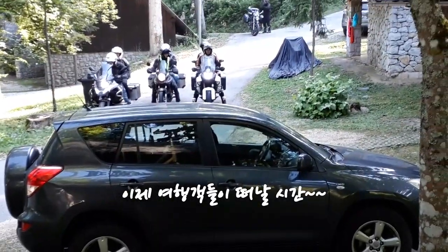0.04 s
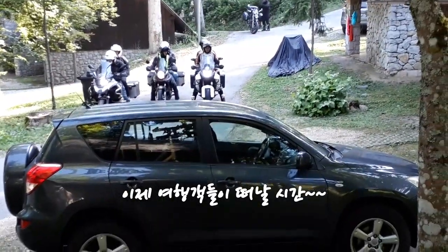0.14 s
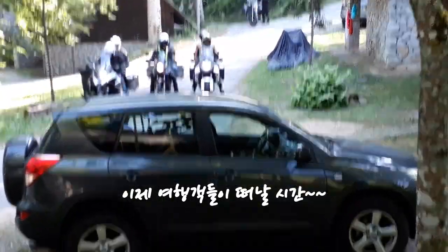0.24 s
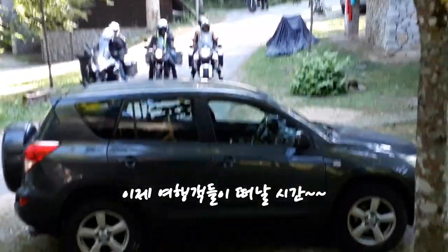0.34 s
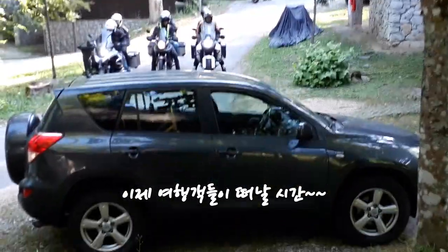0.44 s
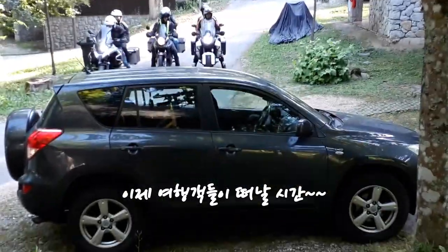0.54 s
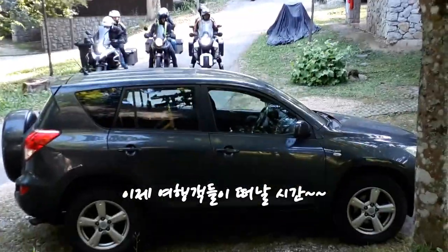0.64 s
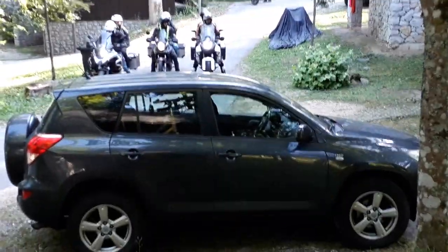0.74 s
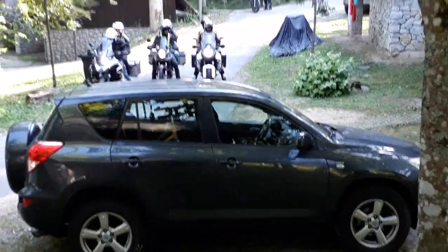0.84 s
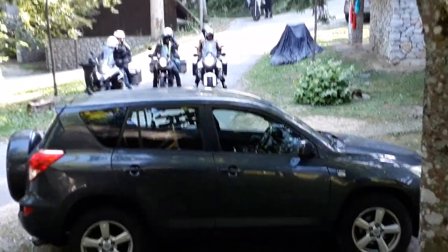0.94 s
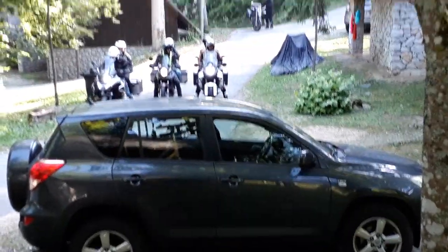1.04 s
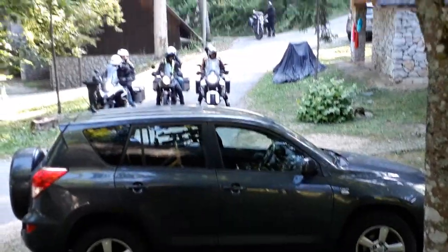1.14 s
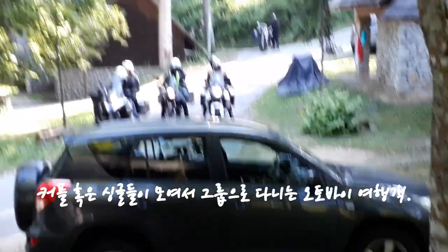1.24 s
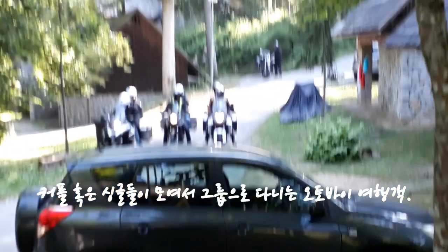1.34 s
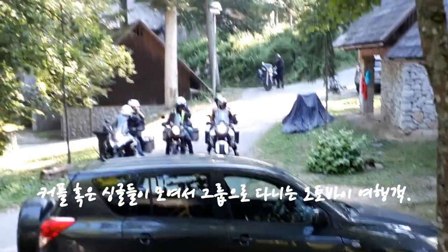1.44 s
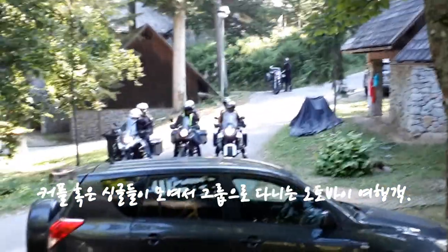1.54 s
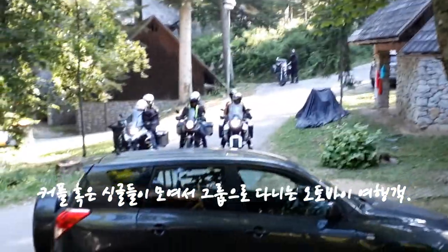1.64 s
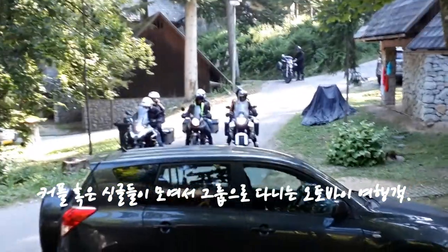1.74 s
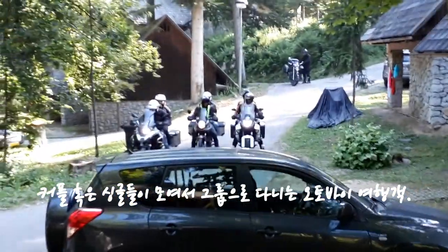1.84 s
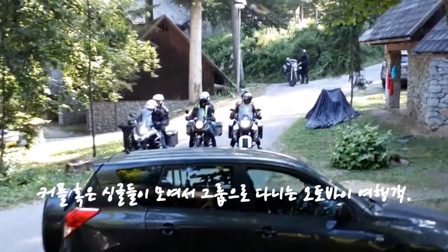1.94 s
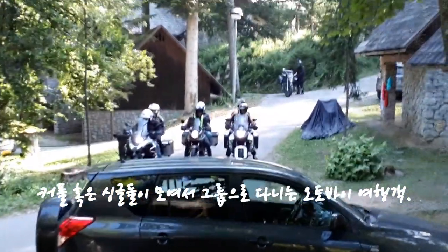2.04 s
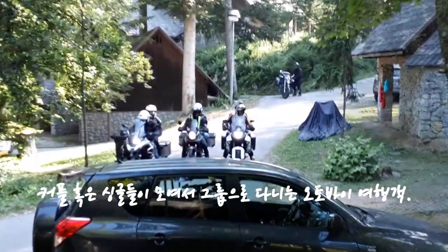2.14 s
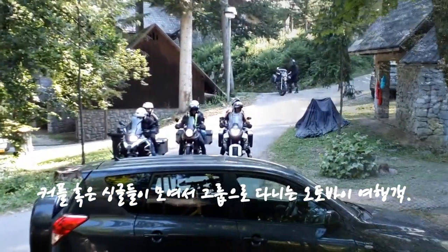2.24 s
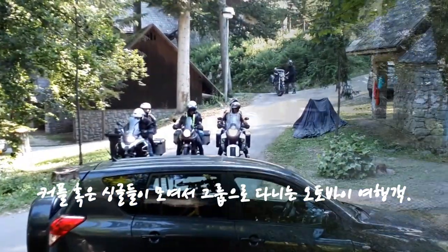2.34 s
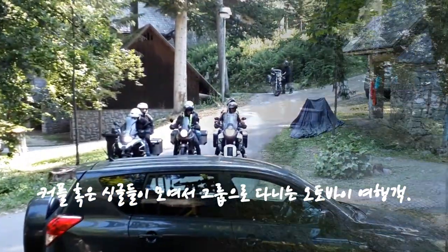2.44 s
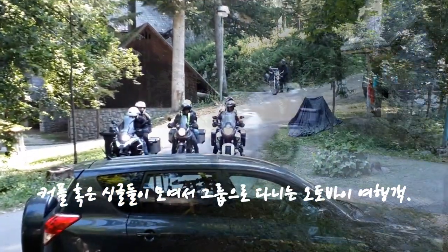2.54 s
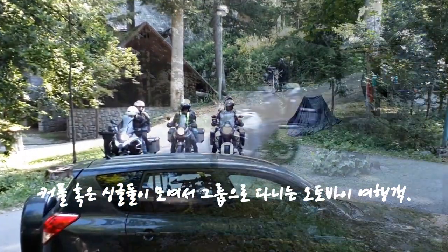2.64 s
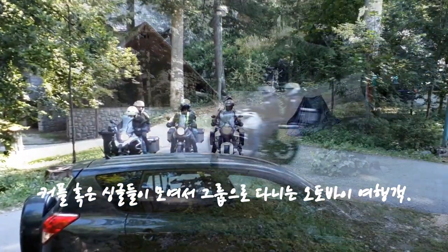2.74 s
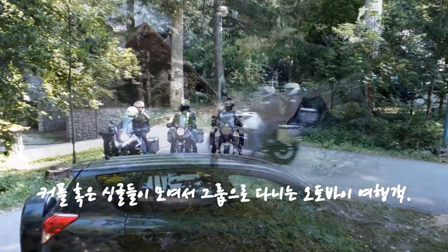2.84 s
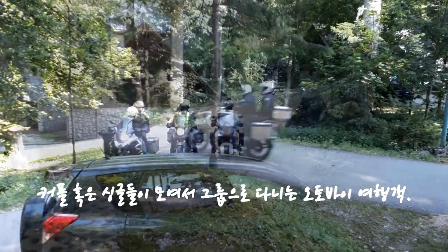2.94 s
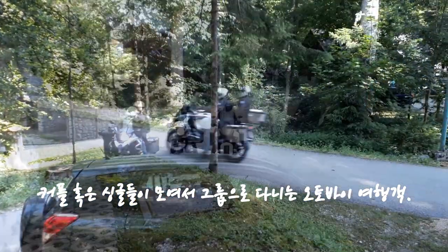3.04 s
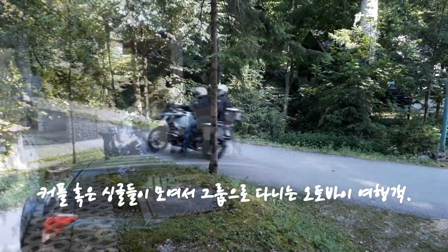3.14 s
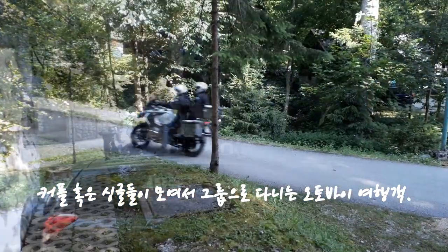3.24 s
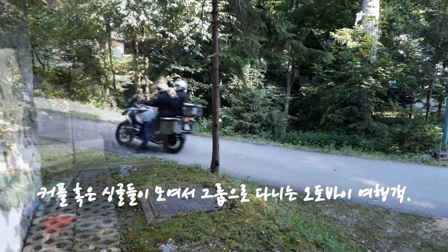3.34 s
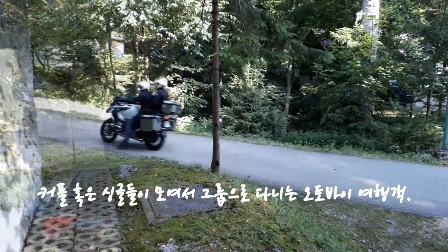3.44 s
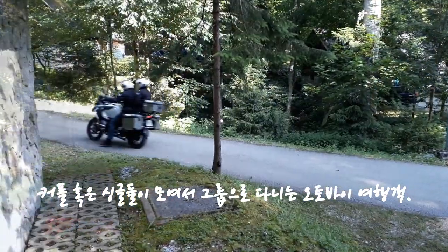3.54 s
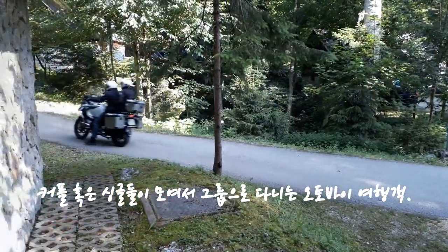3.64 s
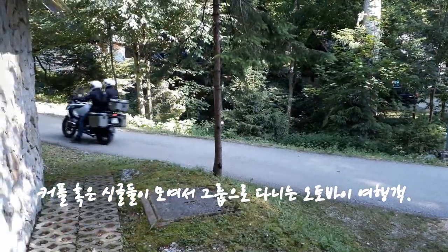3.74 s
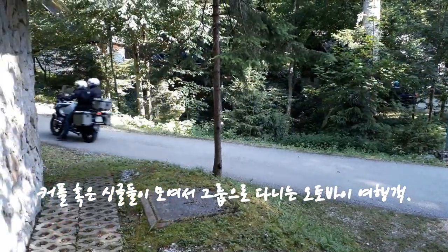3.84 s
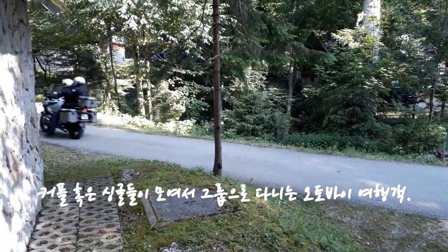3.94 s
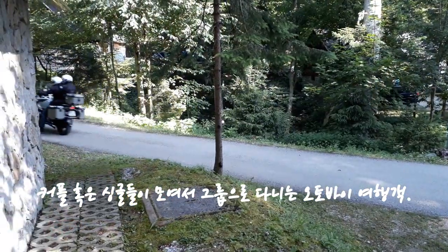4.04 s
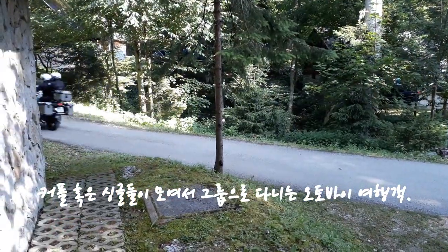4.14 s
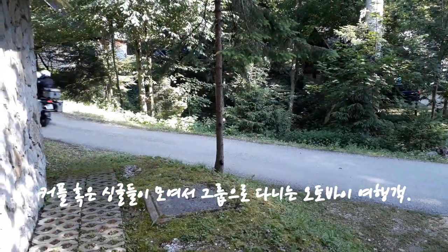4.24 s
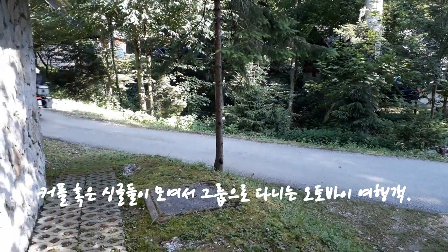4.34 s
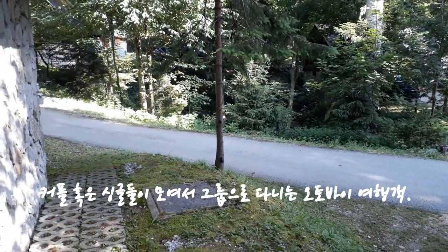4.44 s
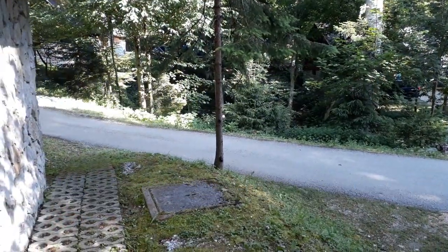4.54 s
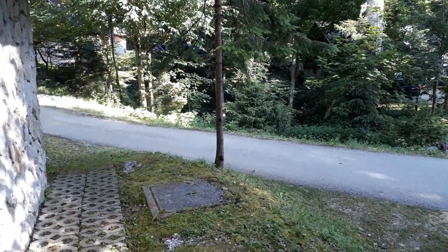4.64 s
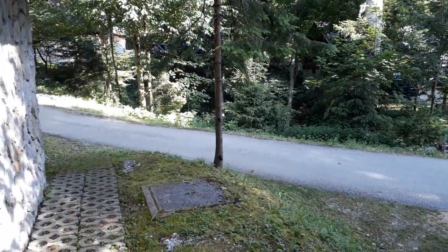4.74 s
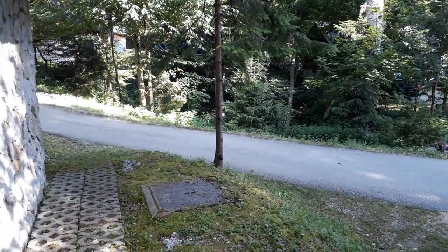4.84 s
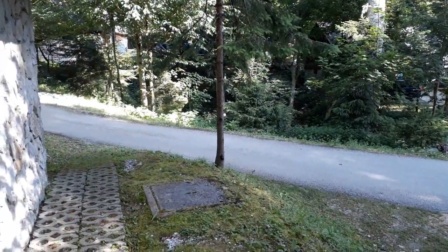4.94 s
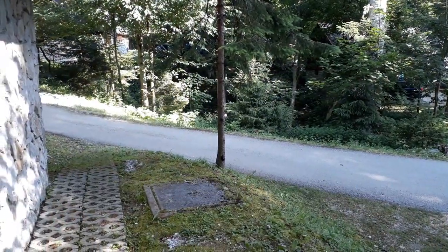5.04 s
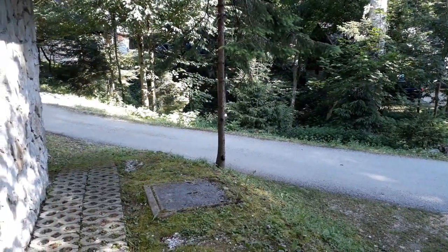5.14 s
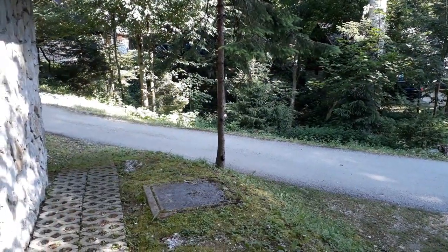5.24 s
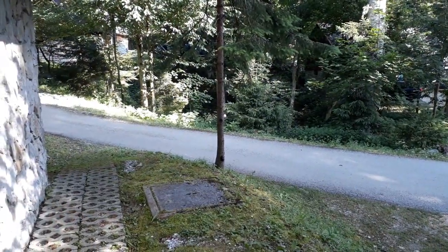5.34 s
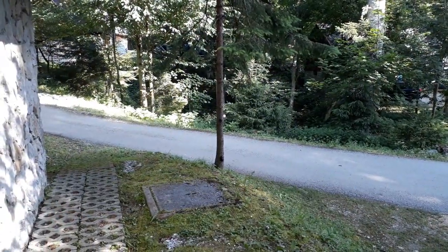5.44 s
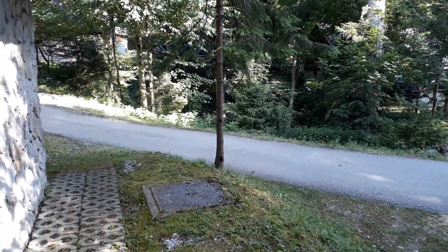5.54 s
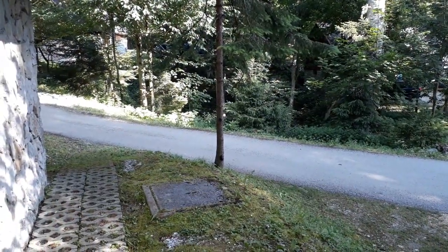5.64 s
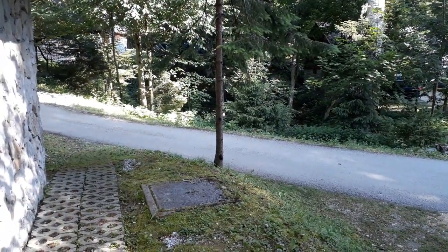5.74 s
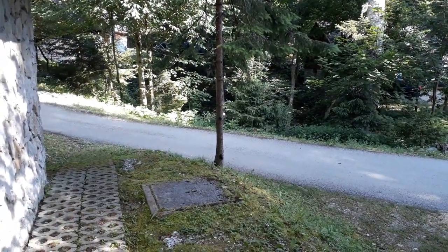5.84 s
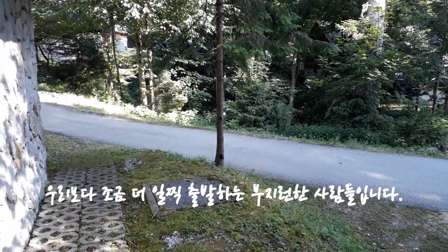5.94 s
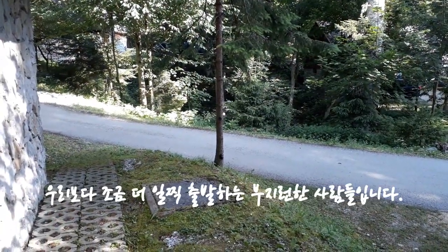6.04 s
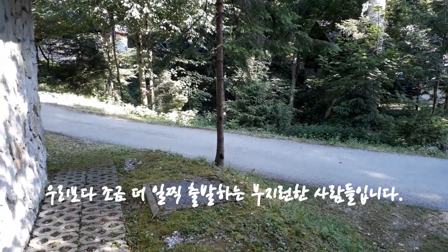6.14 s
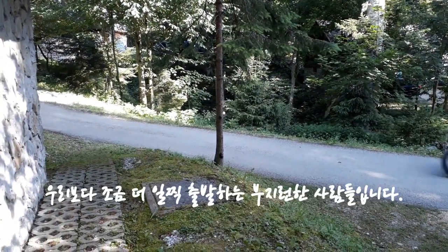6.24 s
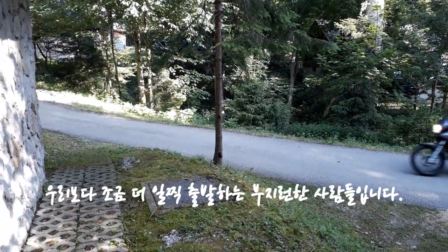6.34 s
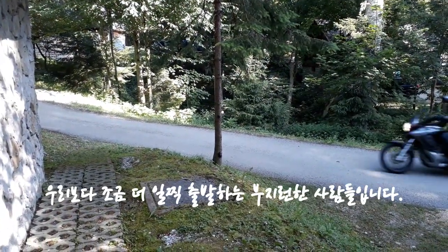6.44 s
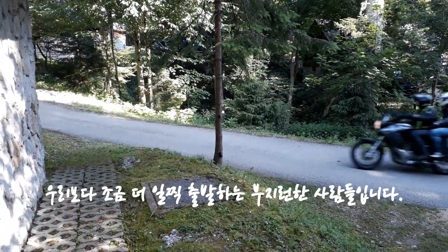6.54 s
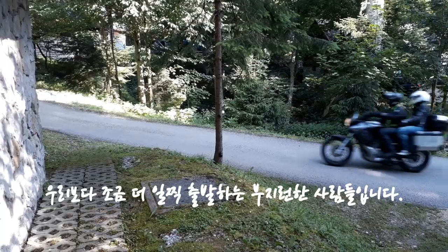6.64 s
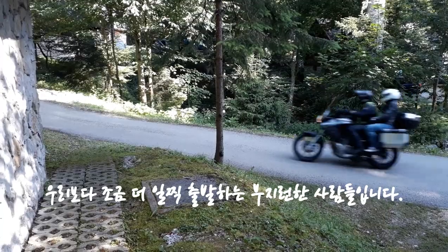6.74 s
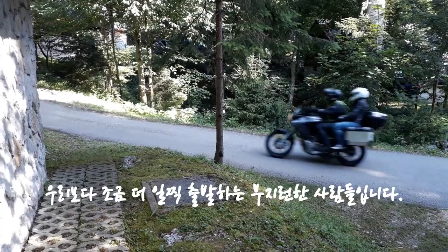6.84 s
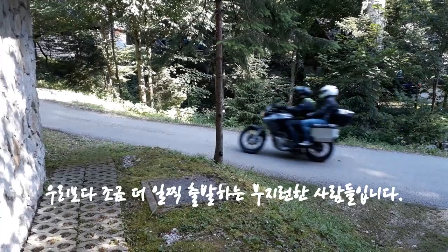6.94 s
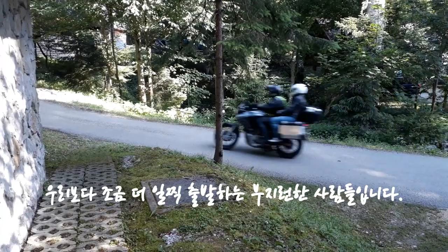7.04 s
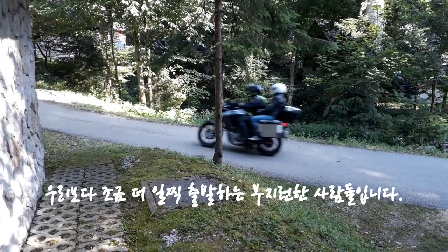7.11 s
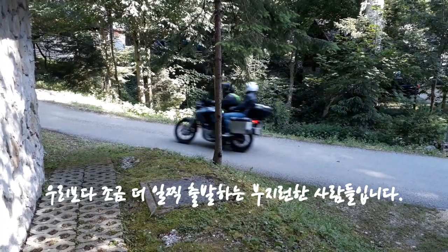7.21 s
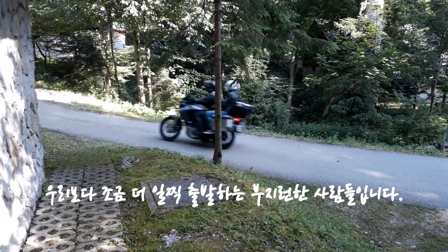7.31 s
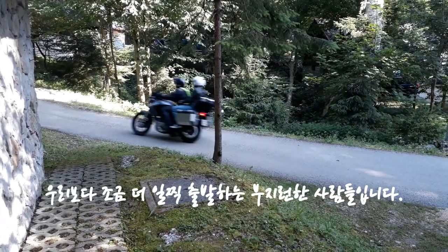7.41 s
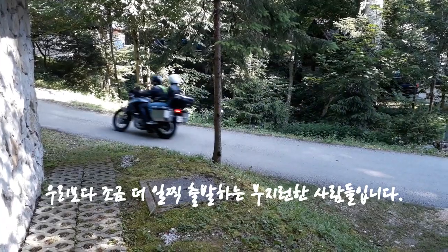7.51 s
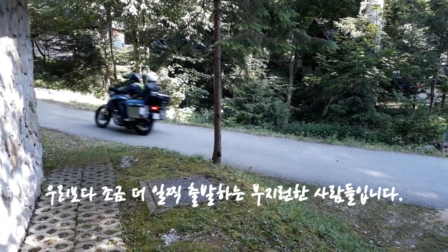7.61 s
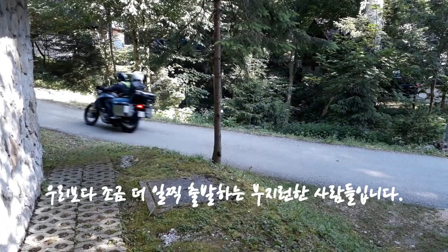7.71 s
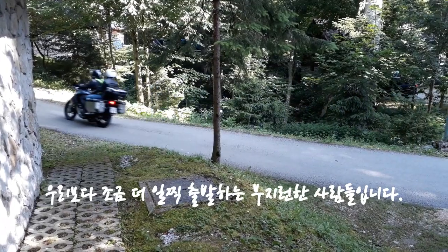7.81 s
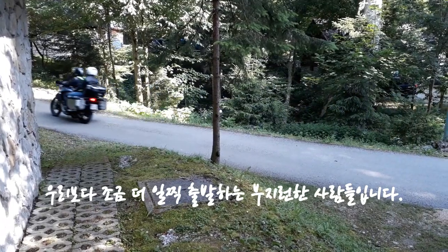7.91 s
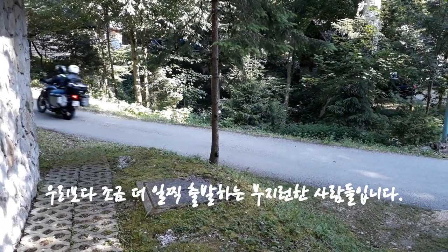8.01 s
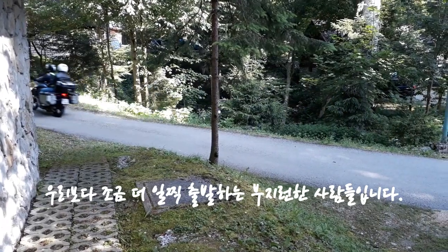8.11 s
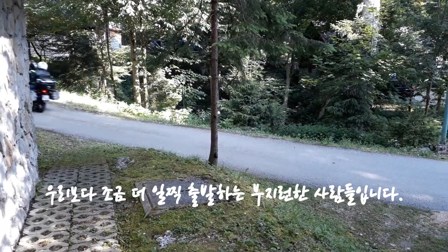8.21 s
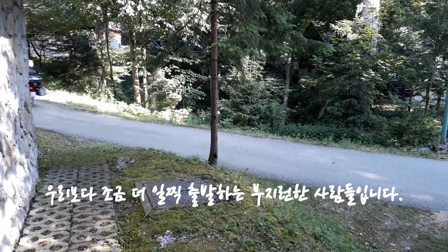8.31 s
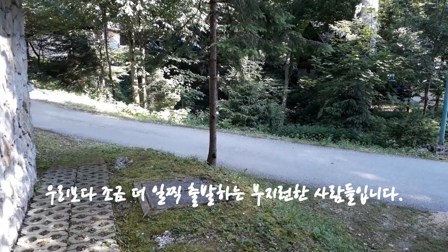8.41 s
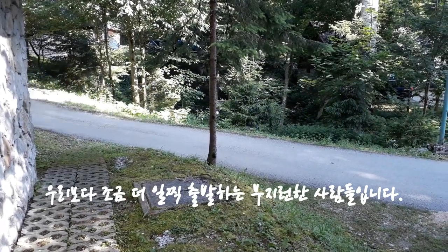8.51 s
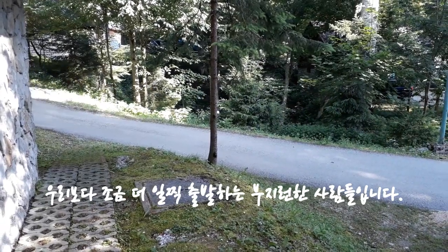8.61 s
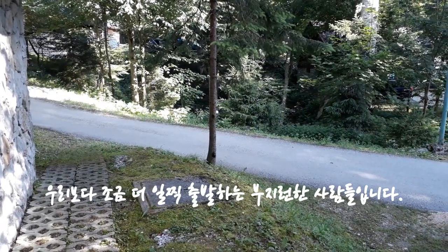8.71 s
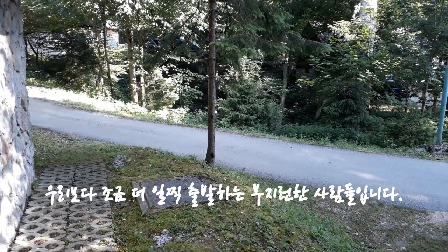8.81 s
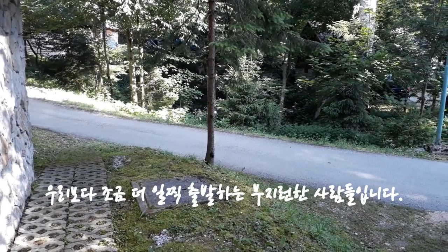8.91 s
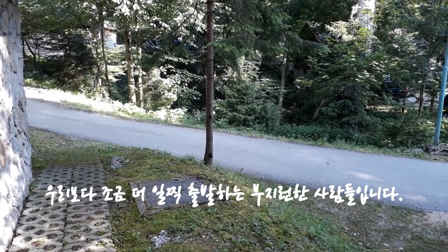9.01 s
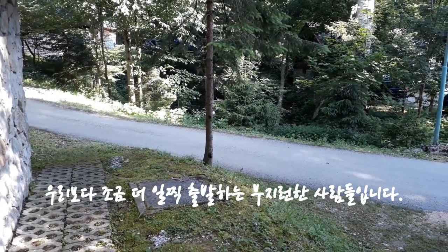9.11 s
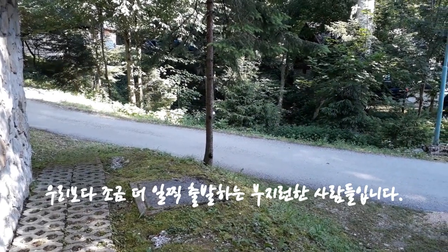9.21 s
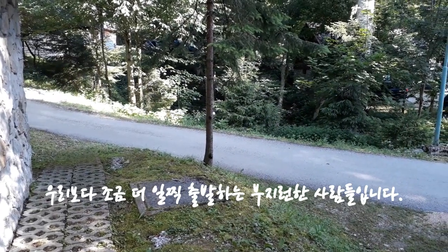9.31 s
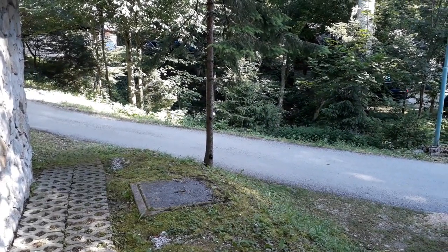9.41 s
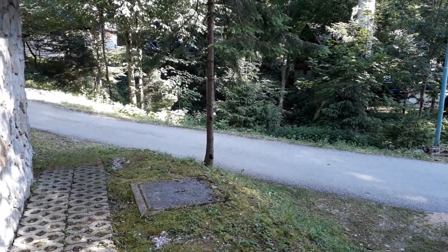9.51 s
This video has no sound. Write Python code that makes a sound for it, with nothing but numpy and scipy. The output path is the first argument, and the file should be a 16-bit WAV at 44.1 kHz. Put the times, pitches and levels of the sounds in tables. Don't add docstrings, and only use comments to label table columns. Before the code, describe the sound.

Outdoors in a wooded campsite, several touring motorcycles idle together with low uneven thumping, valve clatter and soft hiss, plus faint bird and insect chirps. The group fades slightly, then a short silence. The sound returns as a fast-turning bike passes close and rides off; a slower, lumpier twin follows, gaining revs with whine and metallic ringing. Idling continues behind while a bird sings nearby. A fixed roadside microphone hears the passes.

```python
import sys
import numpy as np
from scipy import signal
from scipy.io import wavfile
from scipy.ndimage import uniform_filter1d, map_coordinates

SR = 44100
rng = np.random.default_rng(int(sys.argv[2]) if len(sys.argv) > 2 else 0)


def output_pcm(signal):
    pcm = np.clip(np.atleast_2d(signal).T, -1, 1) * 32767
    wavfile.write(sys.argv[1], SR, np.round(pcm).astype(np.int16))


def natural_amplitude(level_db):
    exponent = np.asarray(level_db, float) / 20
    return 10 ** exponent


N = 422037
T = np.arange(N) / SR
CHANGE_S, BACK_S = 2.8795, 3.2


def evened(x):
    return x / np.sqrt(np.mean(x ** 2) + 1e-20)


def read(points, hz):
    point_hz, value = np.transpose(points)
    return np.interp(np.log(hz + 1), np.log(point_hz + 1), value)


def columns(rows):
    time_s, *values = np.transpose(rows)
    return [np.interp(T, time_s, v) for v in values]


def bell(t, peak_s, spread_s):
    return np.exp(-((t - peak_s) / spread_s) ** 2)


def swells(rows):
    return sum(db * bell(T, peak_s, spread_s) for peak_s, spread_s, db in rows)


def drift(hz):
    knots = rng.standard_normal(int(N / SR * 2 * hz) + 3)
    return evened(map_coordinates(knots, [T * 2 * hz], order=3))


def colour(x, points):
    bin_hz = abs(np.fft.fftfreq(16384, 1 / SR))
    log_gain = np.log(natural_amplitude(np.maximum(read(points, bin_hz), -100)))
    taps = np.fft.ifft(np.exp(np.conj(signal.hilbert(log_gain)))).real[:8192]
    return signal.oaconvolve(x, taps)[:N]


def resonate(x, hz, width_hz):
    turn = np.exp(2j * np.pi * np.cumsum(hz * np.ones(len(x))) / SR)
    r = np.exp(-np.pi * width_hz / SR)
    slow = x / turn
    for _ in range(2):
        slow = signal.lfilter([1 - r], [1, -r], slow)
    return 2 * (turn * slow).real


def per_cycle(turns, spread_db):
    strength = rng.standard_normal(int(turns[-1]) + 3)
    return natural_amplitude(spread_db * np.interp(turns + .5, np.arange(len(strength)), strength))


def exhaust(rows, faces):
    level_db, facing = columns(rows)
    return [level_db + np.interp(facing, np.arange(len(faces)), face) for face in np.transpose(faces)]


# hz, gain_db
PIPE = [(30, -13.5), (60, -26), (110, 1.5), (160, -2), (200, -5), (260, -7), (350, 1.5), (500, -7.5),
        (800, -17), (1500, -31)]
TWIN_SHARE = [(1, .4), (2, .65), (2.7, .9)]


def rider(speed, rows, faces, anchors, orders, wobble, spread_db, smear, scatter, lag, twin, order):
    hz, levels_db = columns(speed)[0], exhaust(rows, faces)
    turns = np.cumsum(hz) / SR - lag + wobble * drift(9)
    on = uniform_filter1d(1. * (T > rows[0][0]) * (T < rows[-1][0] + .01), size=4000)

    coarse = np.flatnonzero(on[::10] > 0) * 10
    blows = np.zeros(len(T[::10]))
    few_db = np.array(levels_db)[:, coarse]
    other = twin * np.interp(columns(rows)[1][coarse], *np.transpose(TWIN_SHARE))
    for k, order_db in enumerate(orders, start=1):
        weights = [np.interp(np.log(k), np.log(anchors), row) for row in np.eye(len(anchors))]
        level_db = order_db + np.dot(weights, few_db) - read(PIPE, k * hz[coarse])
        knots = rng.standard_normal((2, 120))
        fading_db, slip = [smear * k * np.interp(T[coarse], np.arange(120) / 12, row) for row in knots]
        share, gap = other / (1 + (k / 20) ** 2), 2 * np.pi * k * .55
        pull = np.arctan2(-share * np.sin(gap), 1 + share * np.cos(gap))
        phase = 2 * np.pi * k * (turns[coarse] + scatter * k * rng.uniform(-1, 1)) + pull + .12 * slip
        blows[coarse // 10] -= natural_amplitude(level_db + .6 * fading_db) * np.cos(phase)
    blows = signal.resample_poly(blows, 10, 1)[:N] * per_cycle(turns, spread_db)

    gate = natural_amplitude(levels_db[order]) * on * np.exp(-(turns % 1) / .3)
    return np.sqrt(2) * on * colour(blows, PIPE), gate


# time_s, cycle_hz
FIRST_HZ = [(3.2, 35.7), (3.48, 37.3), (4.24, 40.4), (4.49, 40.7), (4.61, 41.5), (4.81, 40.5), (5.12, 41.3),
            (5.94, 39.1), (6.3, 36.8)]
# time_s, level_db, facing (0 side - 2 tail)
FIRST = [
    (3.1, -28.5, 0.096),
    (3.5, -26, 0.037),
    (3.8, -26, 0.61),
    (4.4, -29, 1.42),
    (4.65, -32, 2),
    (5.12, -34, 1.8),
    (5.63, -34, 2),
    (5.94, -36.5, 1.9),
    (6.3, -46, 1.1),
]
FIRST_FACES = [
    (-12.5, 0, -5.5, -4.5, -13.5, -28),
    (-9, 0, -8, -12, -13.5, -18),
    (-6.5, 0, -9, -11, -18, -28),
]
FIRST_ANCHORS = [2, 3, 4, 6, 9, 11]
# level_db of orders 1, 2, 3 ..
FIRST_ORDERS = [-25, 0, 0, 0, -6, 0, -8, -13, 0, -9, 4, -9, -12, -14, -13, -14]


def first_rider():
    return rider(FIRST_HZ, FIRST, FIRST_FACES, FIRST_ANCHORS, FIRST_ORDERS, wobble=.005, spread_db=1.2,
                 smear=.02, scatter=.002, lag=.025, twin=0, order=1)


# time_s, cycle_hz
SECOND_HZ = [(4.9, 14.8), (5.88, 15.85), (6.47, 19.3), (6.79, 21), (7.5, 23.9), (7.83, 25.5), (8.53, 27.9),
             (8.93, 27.8), (9.57, 26.5)]
# time_s, level_db, facing (0 head-on - 6 gone)
SECOND = [(4.9, -42.5, -1.5), (6.0, -46, 0), (6.3, -43, -0.5), (6.5, -33, .5), (6.75, -27.5, 1),
          (7.0, -29, 2), (7.3, -31.5, 3), (7.7, -38, 4), (8.2, -40.5, 5), (8.8, -44.5, 6), (9.57, -50.5, 6)]
SECOND_FACES = [
    (-21, -8, -1.5, 0, 3.5, -7.5, -6.5, -7, -11.5, -13.5, -15.5),
    (-27, -6, 4, 0, -14, -5.5, -13, -16, -18, -14.5, -25),
    (-18, -6.5, 0.5, 0, -20, -5, -12, -3.5, -27, -23, -19),
    (-10, 2, -3, 0, -11, -1, -12, -13.5, -15.5, -22, -20),
    (1.5, 9, 3, 0, -2, -1, 5, -1, 1, -11.5, -18),
    (1, 4.5, 4, 0, -19, -1.5, -2, 0, -9, -28, -25),
    (0, 5, 2, 0, -11, -15, -9.5, -13, -21, -30, -41),
]
SECOND_ANCHORS = [3, 5, 6, 7, 9, 11, 14, 16, 18, 23, 33]
# level_db of orders 1, 2, 3 ..
SECOND_ORDERS = [-38, -26, 0, 1, 0, 0, 0, -6, 0, -8, 0, -6, -10, 0, -6, 0, -1, 0, -2, 2, -6, -2, 0, -3, 0,
                 -1, -5, -4, -1, 2, -3, -1, 0, 0, -4, -2, 2, -3, 1, 0, -4, -2, -4, -2, -1, -5, -2, -5, -3,
                 -5]
SECOND_LAG = .08


def second_rider():
    return rider(SECOND_HZ, SECOND, SECOND_FACES, SECOND_ANCHORS, SECOND_ORDERS, wobble=.0025, spread_db=1.1,
                 smear=.06, scatter=.0016, lag=SECOND_LAG, twin=1, order=3)


# time_s, mesh_hz
GEAR_HZ = [(4.2, 104), (4.6, 112.5), (5.0, 115.5), (5.5, 118), (6.0, 120.5), (6.6, 123)]
# multiple, width_hz, peak_s, spread_s, level_db
GEAR_WHINE = [(4, 15, 6.28, 0.71, -44), (5, 9.7, 5.83, .3, -49), (6, 27, 4.7, .45, -50.5),
              (6, 17, 5.56, 0.49, -51), (8.5, 23, 4.78, 0.47, -54), (8.85, 35, 5.38, 0.4, -52.5),
              (8.3, 20, 6.1, 0.22, -52)]


def gears():
    mesh_hz, noise, out = columns(GEAR_HZ)[0], rng.standard_normal(N), np.zeros(N)
    for multiple, width_hz, peak_s, spread_s, level_db in GEAR_WHINE:
        near = abs(T - peak_s) < 3 * spread_s
        tone_hz = multiple * mesh_hz[near]
        fuzz = evened(resonate(noise[near], tone_hz, width_hz))
        tone = 2 * np.sin(2 * np.pi * np.cumsum(tone_hz) / SR)
        out[near] += natural_amplitude(level_db) * bell(T[near], peak_s, spread_s) * evened(fuzz + tone)
    return out


# peak_s, ring_hz, width_hz, spread_s,
# level_db
SINGING = [(3.55, 2190, 170, 0.34, -48.5), (3.4, 2960, 160, 0.37, -49), (3.4, 3940, 120, .2, -55),
           (4.03, 974, 35, 0.17, -51), (3.86, 1360, 70, .15, -56), (5.38, 91, 6.5, 0.34, -35),
           (6.47, 2700, 200, 0.37, -52), (6.75, 3350, 200, .15, -55), (6.3, 5800, 130, .12, -53),
           (6.5, 4100, 200, .2, -48), (6.6, 495, 14, 0.25, -43.5), (6.75, 1000, 41, 0.25, -39.5),
           (6.7, 1210, 35, 0.12, -42), (7.1, 1060, 94, 0.11, -44), (7.2, 734, 75, 0.24, -39),
           (7.5, 1300, 55, 0.1, -44), (7.7, 453, 70, 0.3, -41), (7.92, 1610, 83, .17, -45),
           (7.9, 2010, 60, 0.15, -47), (7.6, 2700, 90, 0.17, -52)]


def singing_bands():
    noise, out = rng.standard_normal(N), np.zeros(N)
    turns = np.cumsum(columns(SECOND_HZ)[0]) / SR
    firings = evened(np.diff(np.floor(turns + 1 - SECOND_LAG), prepend=0))
    for peak_s, ring_hz, width_hz, spread_s, level_db in SINGING:
        drive = noise + 1.2 * firings * (peak_s > 6.2) * (ring_hz < 1400)
        near = abs(T - peak_s) < 3 * spread_s
        ring = evened(resonate(drive[near], ring_hz, width_hz))
        out[near] += natural_amplitude(level_db) * bell(T[near], peak_s, spread_s) * ring
    return out


# firing_hz, level_db
IDLERS = [(26.86, 5.5), (19.33, 3), (21.32, 3.5), (23.71, 1)]


def idlers(shake, spread_db):
    clicks = np.zeros(N)
    for firing_hz, level_db in IDLERS:
        turns = np.cumsum(firing_hz * (1 + shake * drift(3))) / SR + rng.random()
        clicks[1:] += natural_amplitude(level_db) * np.diff(np.floor(turns)) * per_cycle(turns, spread_db)[1:]
    puffs = signal.lfilter([1], [1, -np.exp(-1 / (0.0036 * SR))], clicks)
    return evened(clicks - clicks.mean()), evened(puffs)


# hz, density_db (per Hz)
THUMP = [
    [(15, -69), (25, -24), (42, -9.5), (65, -2), (145, 2.5), (167, -1.5), (179, -12.5), (217, 2.5),
     (249, -3.5), (279, -15.5), (325, -10), (374, -15.5), (412, -11), (461, -23.5), (700, -32),
     (910, -59.5), (1540, -120)],
    [(15, -88), (25, -50), (37, -41.5), (51, -10.5), (72, -3.5), (119, 4.5), (181, -4), (264, -6.5),
     (379, -14), (412, -42.5), (467, -22.5), (560, -24.5), (700, -37.5), (910, -47), (1540, -120)],
]


def thump(shot, clicks):
    return evened(colour(clicks + (.8 + .5 * shot) * rng.standard_normal(N), THUMP[shot]))


def near_far(x, colours, near):
    return near * evened(colour(x, colours[0])) + (1 - near) * evened(colour(x, colours[1]))


# hz, density_db (per Hz)
CLATTER = [
    [[(260, -45.5), (450, -5.5), (633, -14.5), (701, -11), (772, -18), (873, -6.5), (1310, -13.5),
     (1520, -11), (1650, -18.5), (1950, -18), (2300, -17), (2990, -47), (5060, -120)], [(260, -48),
     (450, -10), (843, -9), (921, -12.5), (1010, -3), (1100, -12), (2160, -25.5), (2300, -24), (2990, -37),
     (5060, -120)]],
    [[(260, -29), (450, -2.5), (488, -5), (583, -14), (669, -9.5), (885, -13), (993, -9), (2300, -19.5),
     (2990, -45), (5060, -120)], [(260, -32), (450, 0), (549, -3), (591, -11), (633, -4), (687, -7.5),
     (1130, -4), (1240, -4.5), (2300, -8), (2990, -26), (5060, -120)]],
]
# ring_hz, width_hz, level_db
CASINGS = [(412, 21, -3), (863, 85, -13), (1026, 74, -20.5), (1982, 220, -12)]


def clatter(shot, beat, near):
    knocks = rng.standard_normal(N) * (1 + 0.14 * beat) * natural_amplitude(1.0 * drift(12))
    out = near_far(knocks, CLATTER[shot], near)
    if shot == 0:
        for ring_hz, width_hz, level_db in CASINGS:
            moving_hz = ring_hz + 0.19 * width_hz * drift(0.97)
            out += natural_amplitude(level_db + 2 * drift(2.01)) * evened(resonate(knocks, moving_hz, width_hz))
    return out


# hz, density_db (per Hz)
FIZZ = [
    [[(1000, -40.5), (1700, -10), (1970, -6.5), (2420, -10), (2960, -7), (3700, -10.5), (4620, -10.5),
     (6450, -16), (7420, -17), (9440, -28), (11100, -25.5), (12600, -26.5), (15600, -31)], [(1000, -21),
     (1700, -5), (2010, -10), (2160, -4.5), (3500, -5.5), (3810, -5), (7420, -19), (9440, -30.5),
     (11400, -24), (15600, -33.5)]],
    [[(1000, -6.5), (1700, 0), (2290, -0.5), (2940, 1.5), (3470, -1.5), (4620, -4), (5830, -9),
     (7910, -24.5), (9520, -29), (11500, -22.5), (13300, -27.5), (15600, -38)], [(1000, -35.5), (1700, -4),
     (1880, 0), (3220, -2), (3600, -1.5), (4840, -4), (6100, -7.5), (8060, -22.5), (9520, -25.5),
     (11400, -21.5), (12900, -27.5), (15600, -29.5)]],
]
# peak_s, spread_s, treble_db
GUSTS = [(.8, 0.36, 1), (3.4, 0.88, -1), (6.2, 0.93, 3.5), (9.4, 0.58, 5)]


def fizz(shot, beat, near):
    hiss = rng.standard_normal(N) * (1 + 0.088 * beat) * natural_amplitude(0.41 * drift(6))
    out = near_far(hiss, FIZZ[shot], near)
    treble = signal.sosfiltfilt(signal.butter(2, 6500, "high", fs=SR, output="sos"), out)
    return out + (natural_amplitude(-1 + swells(GUSTS)) - 1) * treble


# thump_db, clatter_db, fizz_db
STEADY_DB = [
    (-34.5, -46.5, -44.5),
    (-32, -46, -44.5),
]
# time_s, level_db
TURN_AWAY = [(0, 0), (1.9, 0), (2.1, -1), (2.3, -2.5), (2.5, -4), (2.88, -6)]
TURN_SHARE = (0.93, 1.53, 0.94)
# closest_s, road_time_s, clatter_db, fizz_db
PASSES = [
    (3.6, 0.88, -49.5, -41),
    (4.0, 0.61, -43, -44),
    (6.75, 0.49, -34.5, -36),
    (7.7, 0.84, -42.5, -38.5),
]
# peak_s, spread_s, thump_db
BLIPS = [
    (4.2, 0.46, -0.5),
    (4.9, .3, 1.5),
    (5.6, 0.22, -2),
    (6.35, 0.72, 3),
    (7.8, .2, 0.5),
    (8.2, 0.32, 3.5),
    (8.8, .15, -2),
    (9.3, 0.2, 1),
]


def group_levels(shot):
    thump_db, *noise_db = STEADY_DB[shot]
    if shot == 0:
        fade_db = columns(TURN_AWAY)[0]
        return [db + share * fade_db for db, share in zip(STEADY_DB[0], TURN_SHARE)]
    levels_db = [thump_db + swells(BLIPS)]
    for k, steady_db in enumerate(noise_db):
        power = natural_amplitude(2 * steady_db)
        for closest_s, road_time_s, *peak_db in PASSES:
            power = power + natural_amplitude(2 * peak_db[k]) / (1 + ((T - closest_s) / road_time_s) ** 2) ** 1.3
        levels_db.append(10 * np.log10(power))
    return levels_db


def patchy(x, depth_db):
    z = signal.stft(x, nperseg=1024)[2]
    field = uniform_filter1d(rng.standard_normal(z.shape), size=3, axis=0)
    field = evened(uniform_filter1d(field, size=24, axis=1))
    gain = natural_amplitude(depth_db * field) / np.sqrt(np.mean(natural_amplitude(2 * depth_db * field)))
    return signal.istft(z * gain, nperseg=1024)[1][:N]


# all_near_db, all_far_db
NEAR_DB = [
    (-44.5, -45),
    (-37.5, -44.5),
]


def group(rider_gate):
    clicks, puffs = idlers(shake=0.00594, spread_db=-0.5)
    low, high = np.zeros((2, N))
    for shot in range(2):
        thump_db, clatter_db, fizz_db = group_levels(shot)
        near = np.interp(fizz_db, NEAR_DB[shot][::-1], [0, 1])
        beat = (1 - 0.13 * shot) * puffs + shot * 8.0 * rider_gate
        heard = (T > BACK_S) if shot else (T < CHANGE_S)
        low += heard * natural_amplitude(thump_db) * thump(shot, clicks)
        high += heard * natural_amplitude(clatter_db) * clatter(shot, beat, near)
        high += heard * natural_amplitude(fizz_db) * fizz(shot, beat, near)
    return low + patchy(high, depth_db=1.1)


def sing(rows, arch_turns, echo_share):
    song, lag_s = np.zeros(N), np.arange(14000) / SR
    for start_s, length_s, from_hz, to_hz, level_db in rows:
        t = np.arange(0, length_s, 1 / SR)
        slow = evened(uniform_filter1d(rng.standard_normal((2, 6000)), size=150))
        warble, flutter = slow[:, :len(t)]
        hz = from_hz + (to_hz - from_hz) * np.sin(2 * np.pi * arch_turns * t / length_s) + 45 * warble
        tone = np.sin(2 * np.pi * np.cumsum(hz) / SR) * signal.windows.tukey(len(t), .5)
        song[round(start_s * SR):][:len(t)] += natural_amplitude(level_db + 2 + 1.8 * flutter) * tone
    echoes = rng.choice([-1., 1.], size=14000) * (rng.random(14000) < .03) * natural_amplitude(-60 * lag_s / 0.35)
    echoed = signal.oaconvolve(song, echoes / np.linalg.norm(echoes))[:N]
    return np.sqrt(1 - echo_share) * song + np.sqrt(echo_share) * echoed


# start_s, length_s, from_hz, to_hz, level_db
SINGER = [(5.6, .025, 3700, 3620, -48), (5.609, 0.059, 3050, 2530, -43), (5.666, 0.054, 2550, 2940, -41),
          (5.805, .09, 3630, 3714, -41.5), (6.145, 0.08, 3105, 3046, -37.5), (6.191, .07, 2480, 2710, -47),
          (6.27, .04, 3050, 3150, -46), (6.342, 0.057, 2800, 3030, -45), (6.505, 0.064, 3200, 3130, -41),
          (6.535, .085, 2980, 2930, -41), (6.626, .045, 2950, 3300, -41), (6.664, .075, 2500, 2900, -42),
          (6.786, 0.105, 3320, 3460, -44.5), (6.917, .05, 4450, 4190, -38.5),
          (6.978, 0.031, 3950, 3630, -35.5), (7.01, .025, 3620, 3580, -40), (7.431, .04, 2620, 2690, -42),
          (7.491, 0.061, 3450, 3460, -37), (7.606, 0.047, 3200, 3230, -38), (7.672, .04, 3230, 3150, -44),
          (7.75, 0.075, 3960, 4020, -42), (7.881, .04, 3240, 2660, -40), (7.917, 0.04, 2520, 2570, -40),
          (7.955, .04, 2580, 2950, -46), (8.193, 0.078, 3030, 3280, -42.5),
          (8.252, 0.0293, 3000, 2604, -40.5), (8.267, 0.032, 2620, 2720, -39),
          (8.375, .025, 3500, 3350, -45), (8.389, 0.05, 3120, 3060, -40.5), (8.459, 0.058, 2300, 2550, -48)]
# start_s, length_s, from_hz, to_hz, level_db
OTHERS = [(.245, 0.086, 2900, 3410, -47), (.615, 0.076, 2750, 3430, -48), (.81, 0.077, 2750, 3370, -49),
          (1.455, .055, 2800, 3360, -48.5), (.41, .03, 4520, 4800, -50), (.575, .03, 4570, 4850, -50),
          (.77, .03, 4820, 4570, -54), (1.585, .03, 4300, 4850, -46), (2.222, .025, 4000, 3920, -42),
          (2.34, 0.073, 3960, 3720, -51), (2.43, .03, 3740, 3800, -52), (2.52, .05, 3690, 3830, -53),
          (1.4, .07, 6450, 6470, -51.5), (1.485, .025, 7450, 7250, -55.5), (1.84, .04, 8250, 8200, -59),
          (4.515, .04, 4860, 4830, -43.5), (5.37, 0.043, 3740, 3600, -53), (5.52, .1, 4080, 3630, -52),
          (6.672, .025, 6640, 6450, -47.5), (9.335, .03, 6940, 6640, -58)]


def birds():
    return sing(SINGER, arch_turns=0.292, echo_share=.4) + sing(OTHERS, arch_turns=0.33, echo_share=.6)


# start_s, end_s, level_db, change_db_per_s
WHINE = [
    (.24, 2.05, -67.5, 0.5),
    (8.72, 9.57, -65, -5),
]
# centre_hz, width_hz
WHINE_HZ = [
    (7660, 77),
    (7900, 1900),
]
# start_s, level_db
CHIRPS = [(.245, -52), (.347, -60), (.444, -48.5), (.487, -59), (.551, -53), (.768, -56), (.845, -55),
          (.884, -57), (.964, -56), (1.05, -60), (1.078, -58), (1.246, -60), (1.27, -59), (1.363, -62),
          (1.477, -56), (1.582, -62), (1.775, -62), (1.887, -60)]


def insects():
    out = np.zeros(N)
    for (start_s, end_s, level_db, change_db_per_s), (hz, width_hz) in zip(WHINE, WHINE_HZ):
        span = slice(round(start_s * SR), round(end_s * SR))
        whistle = evened(resonate(rng.standard_normal(N)[span], hz, width_hz))
        whistle_db = level_db + change_db_per_s * (T - start_s) + 3.0 * np.minimum(drift(12), 1)
        out[span] += natural_amplitude(whistle_db)[span] * whistle
    t = T[:4000]
    rise_s, fall_s = 0.005, 0.017
    for start_s, level_db in CHIRPS:
        hz = 7640 + 30 * rng.standard_normal() + 900 * rng.standard_normal(size=4000)
        tone = np.sin(2 * np.pi * np.cumsum(hz) / SR)
        envelope = np.minimum(t / rise_s, 1) * np.exp(-t / fall_s)
        out[round(start_s * SR):][:len(t)] += 2 * natural_amplitude(level_db) * envelope * tone
    return out


def scene():
    first, first_gate = first_rider()
    second, second_gate = second_rider()
    passing = first + second + gears() + singing_bands()
    return (passing + group(first_gate + second_gate) + birds() + insects())[None]


def top_cut(x):
    return signal.sosfilt(signal.butter(12, 15710, fs=SR, output="sos"), x)


def record(dry):
    since_s = T - BACK_S
    fade = 0.026 + (1 - 0.026) * np.clip(since_s / 0.29, 0, 1) ** 1.19
    soft_start = np.clip(since_s / 0.025, 0, 1) ** 2
    return top_cut(dry * np.where(T < CHANGE_S, 1, fade * soft_start))


dry = scene()
out = record(dry)
output_pcm(out)
```